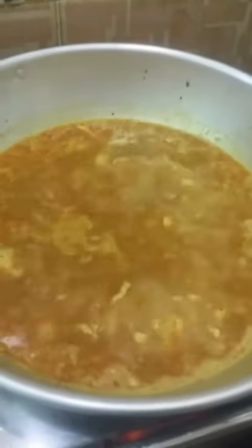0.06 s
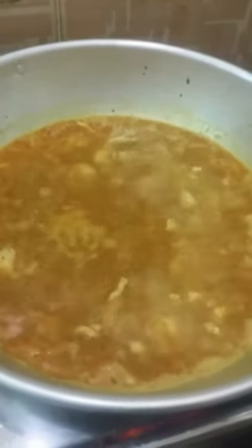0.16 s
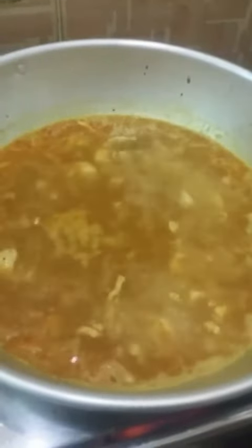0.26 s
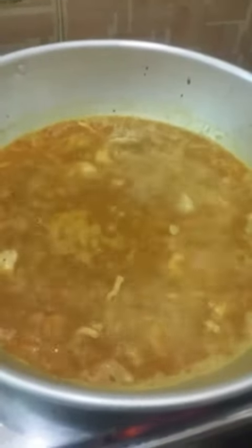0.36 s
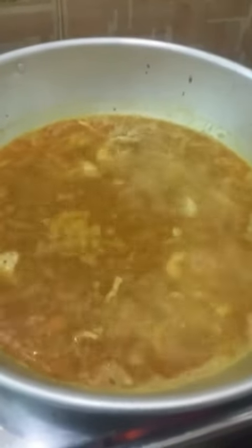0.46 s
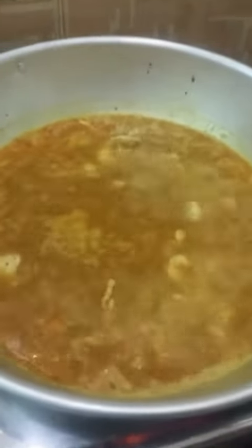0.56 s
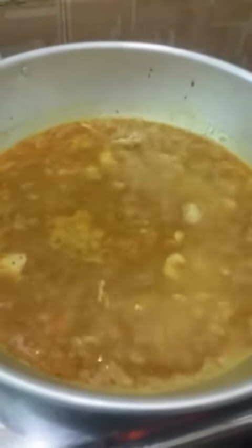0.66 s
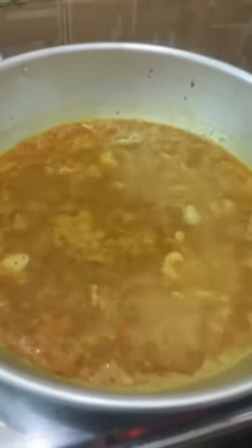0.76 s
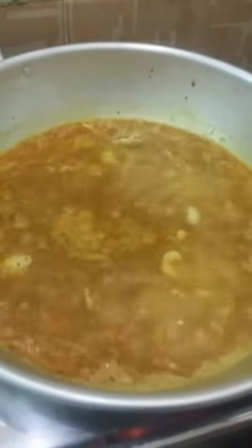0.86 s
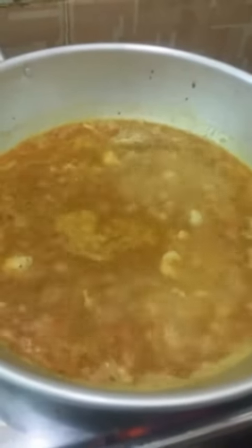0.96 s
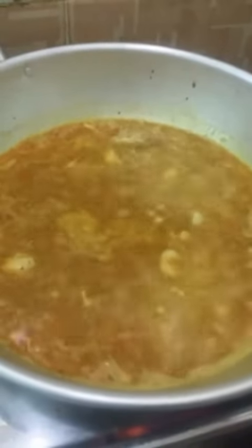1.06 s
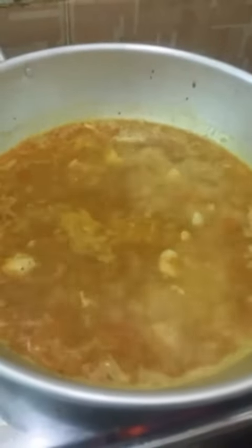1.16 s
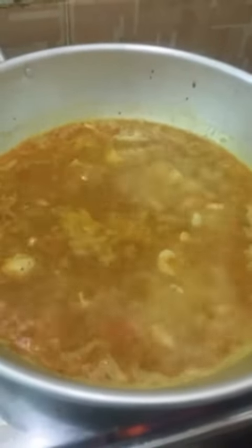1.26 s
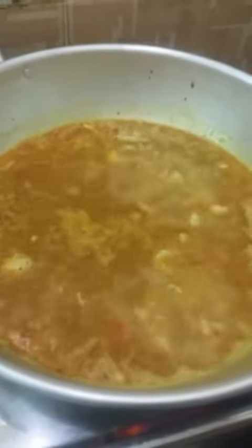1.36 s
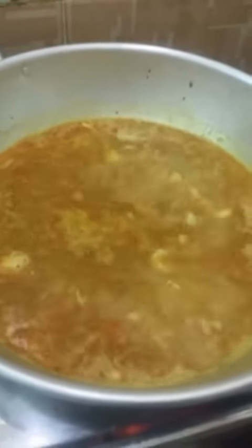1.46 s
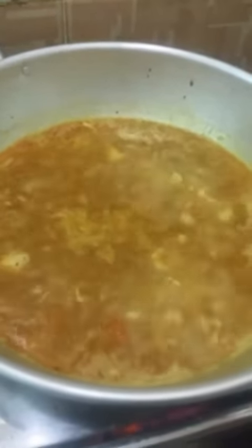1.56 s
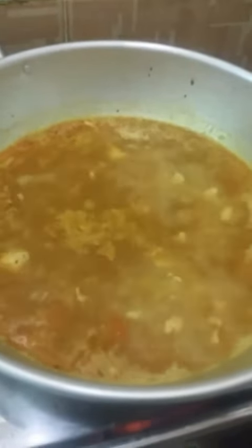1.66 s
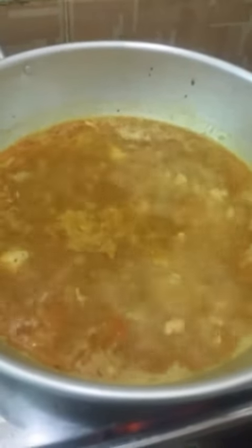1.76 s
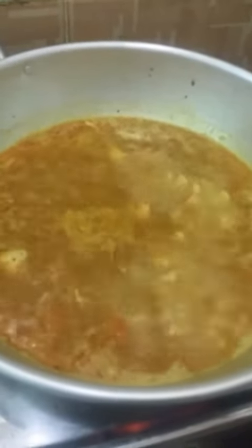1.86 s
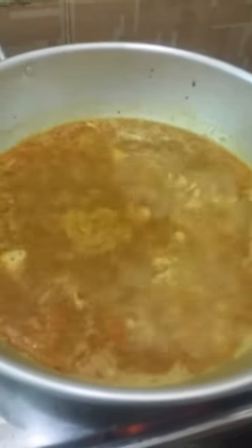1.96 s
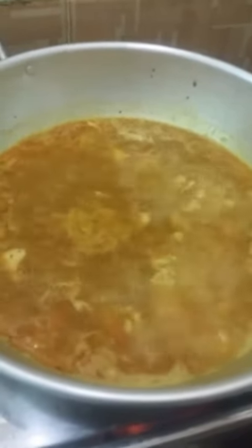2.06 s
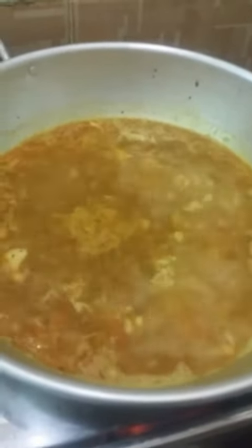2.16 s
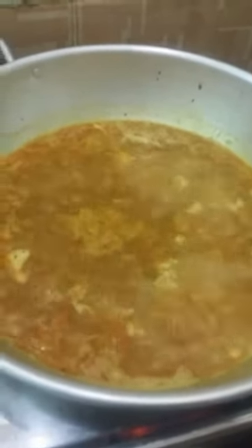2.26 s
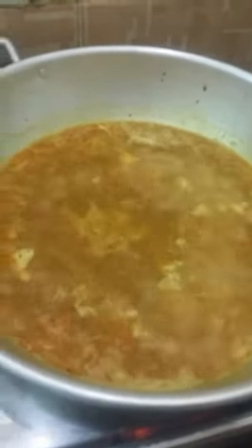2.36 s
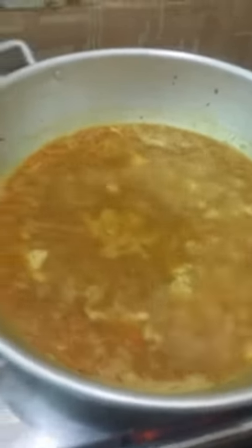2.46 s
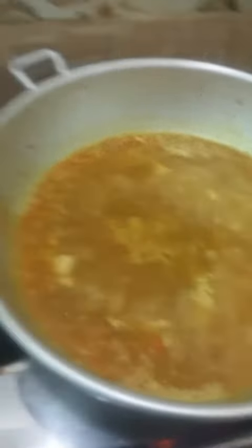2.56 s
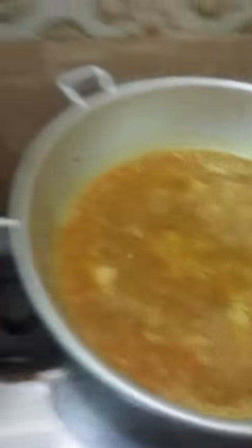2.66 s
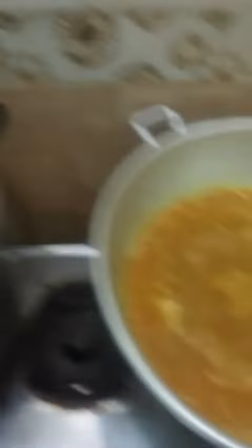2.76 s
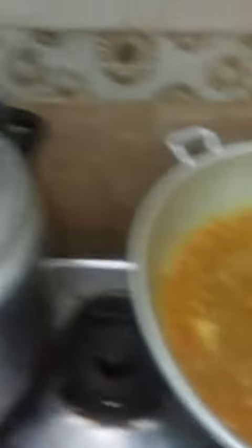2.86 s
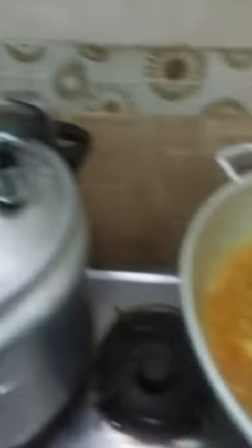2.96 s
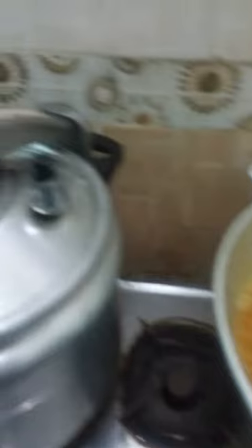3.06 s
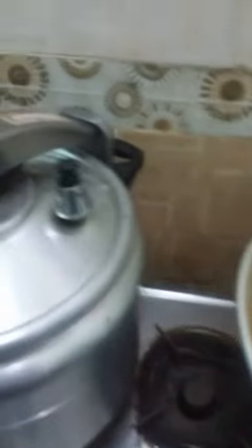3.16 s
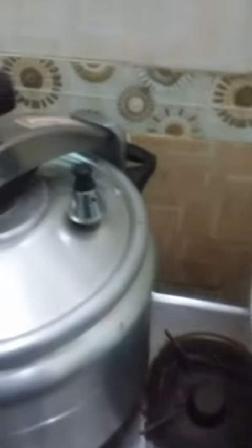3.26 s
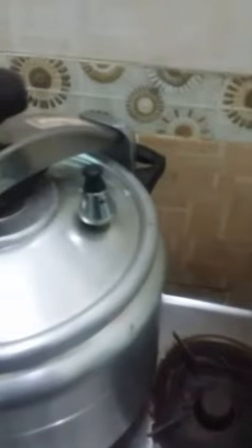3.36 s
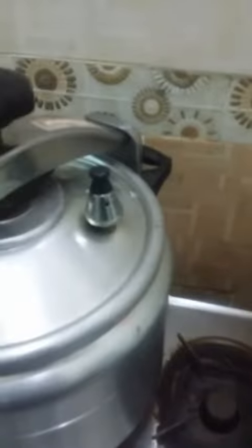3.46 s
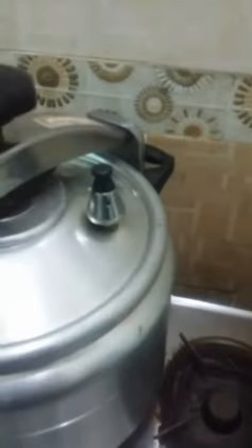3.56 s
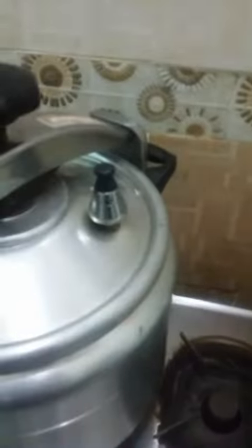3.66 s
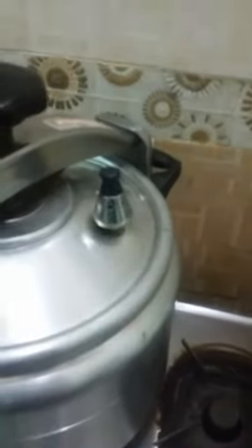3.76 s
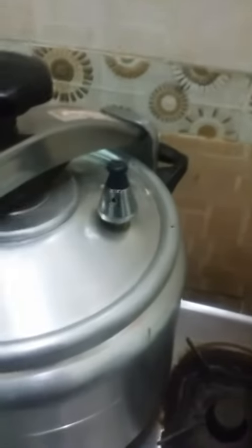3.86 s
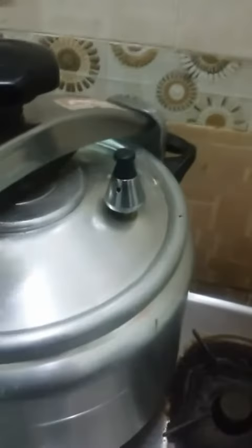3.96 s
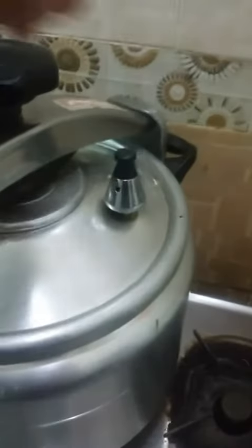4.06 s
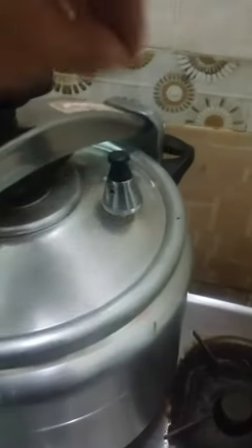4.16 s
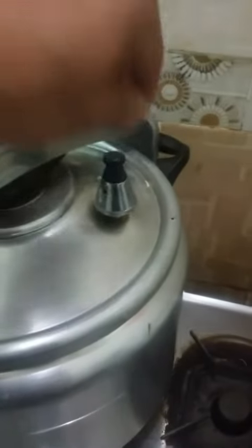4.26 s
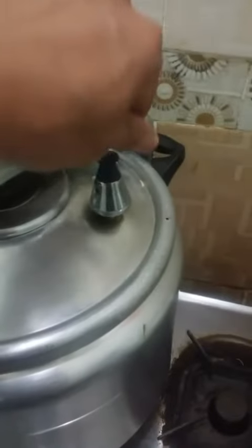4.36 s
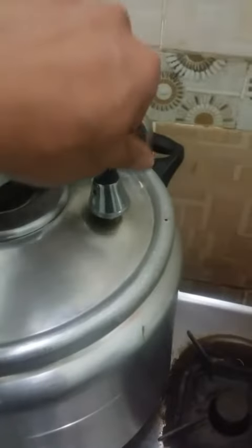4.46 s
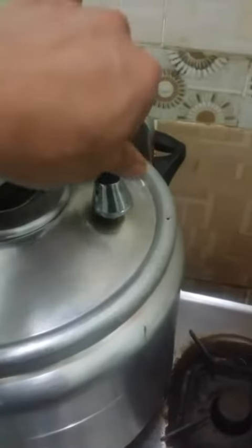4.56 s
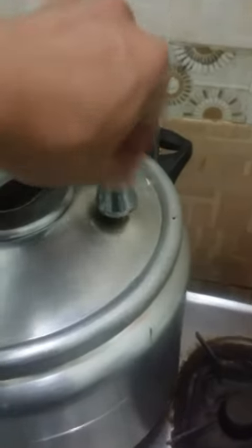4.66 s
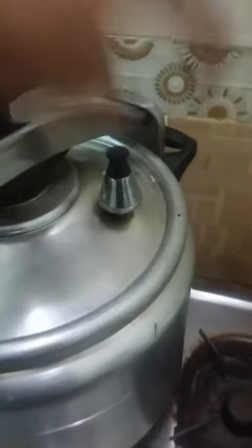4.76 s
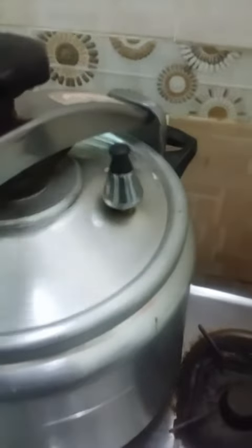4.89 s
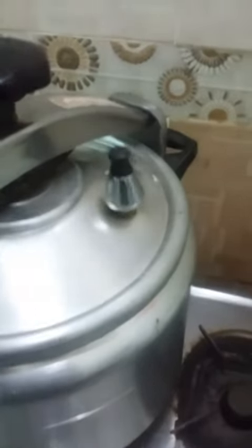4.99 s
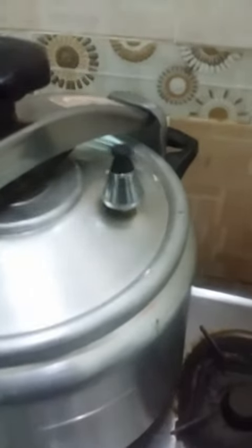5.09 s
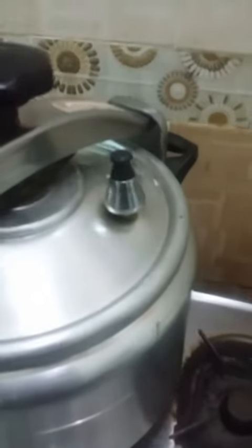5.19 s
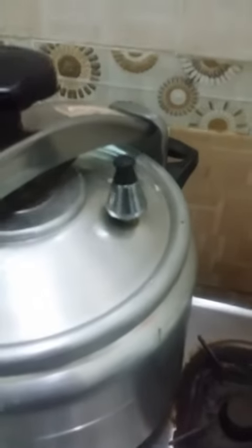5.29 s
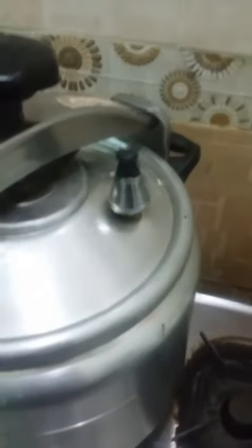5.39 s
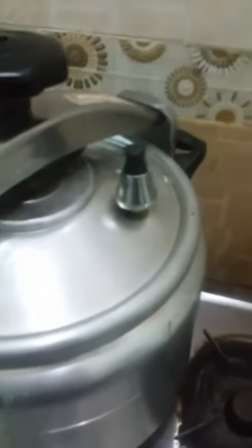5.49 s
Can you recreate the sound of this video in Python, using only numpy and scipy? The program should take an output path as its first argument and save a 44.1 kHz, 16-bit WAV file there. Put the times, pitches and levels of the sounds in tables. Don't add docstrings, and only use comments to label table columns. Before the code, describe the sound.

Continuous high-pitched steam hiss dominates, near and mono on a phone, dipping in quick uneven pulses. Distant knocks sound around two and a half seconds and more heavily near four. A dry tap on the phone lands between them. Then the hiss is briefly squeezed, two short damped metal clinks ring, and steam surges back slightly louder. Low stove rush and hum lie beneath; it cuts off abruptly.

```python
import sys
import numpy as np
from scipy import signal
from scipy.fft import rfft, irfft, next_fast_len
from scipy.io import wavfile
from scipy.ndimage import uniform_filter1d, map_coordinates

SR = 44100
rng = np.random.default_rng(int(sys.argv[2]) if len(sys.argv) > 2 else 0)


def undo_db(level):
    steps = np.asarray(level, float) / 20
    return 10 ** steps


def output_pcm(signal):
    pcm = np.clip(np.atleast_2d(signal).T, -1, 1) * 32767
    wavfile.write(sys.argv[1], SR, np.round(pcm).astype(np.int16))


N = 243873
T = np.arange(N) / SR

# [t/s, share turned to the lid 0-1]
TURN = [
    (0, 0.08),
    (2.45, 0.3),
    (2.85, 0.88),
    (5.6, 1),
]
# [t/s, level/dB]
PRESSURE = [(0, -23), (.9, -23.5), (1.75, -22), (2.4, -24.5), (2.5, -25.5), (2.78, -25), (2.84, -23.5),
            (3.6, -25), (3.97, -21), (4.2, -25.5), (4.46, -21), (4.6, -25.5), (4.72, -23), (4.78, -21.5),
            (5.0, -21.5), (5.23, -21.5), (5.31, -25)]
# [t/s, loss/dB, width/s]
ROCKS = [(0, 5, 0.045), (.11, 3.5, 0.033), (.22, 6.5, .025), (.324, 6, 0.043), (.45, 2.5, 0.029),
         (.535, 2.5, 0.036), (0.623, 3.5, 0.036), (0.999, 3.5, 0.043), (1.162, 2.5, 0.028),
         (1.252, 3, 0.037), (1.36, 1.5, 0.03), (1.44, 2, 0.073), (1.564, 4, 0.041), (1.652, 5, 0.054),
         (1.808, 6, .08), (1.941, 4, 0.1), (2.264, 3, 0.047), (3.059, 4, 0.033), (3.202, 3.5, 0.024),
         (3.317, 2, .03), (3.405, 4.5, 0.049), (3.631, 5, 0.047), (3.712, 8, 0.03), (3.799, 7.5, 0.057),
         (3.881, 4.5, 0.038), (4.04, 4.5, 0.084), (4.432, 5.5, .015), (4.679, 5, 0.024), (5.168, 3.5, .065)]
# [t/s, length/s, loss/dB]
CHOKES = [
    (4.273, 0.16, 8),
    (4.276, 0.033, 1),
    (4.316, 0.05, 6.5),
    (4.393, 0.035, 11.5),
    (4.712, 0.045, 6),
]
# [f/Hz, level/dB per Hz]
JET_PAN = [(470, -33), (800, -27.5), (1340, -13.5), (1830, -14), (2590, -1), (2920, -2.5), (3980, -4),
           (4880, 0.5), (6510, -5.5), (7970, -4.5), (9660, -10.5), (11300, -9.5), (14000, -10)]
JET_LID = [(470, -30), (800, -23), (1310, -19), (1660, -21.5), (1890, -13), (2240, -12.5), (2920, -5.5),
           (4760, -7.5), (5630, -3), (6130, -3.5), (8170, -13), (11200, -12.5), (14000, -11.5)]
# [f/Hz, width/Hz, depth/dB]
PAN_NULLS = [(1900, 120, 4), (2900, 110, 11), (3580, 90, 6), (3950, 100, 3), (6450, 130, 7), (7350, 120, 5),
             (8400, 90, 5), (9750, 220, 8), (10600, 250, 5)]
LID_NULLS = [(2750, 80, 5), (3600, 250, 2.5), (6150, 150, 4), (7300, 120, 3), (8050, 120, 3),
             (8400, 150, 3.5), (9100, 200, 2.5), (10500, 300, 2.5), (12900, 100, 3)]
# [f/Hz, width/Hz]
VENT = [(5620, 410), (7850, 490)]
# [level/dB over the pan, level/dB at the lid]
TONE_DB = (-13, -10)
# [t/s, level/dB under the jet]
OVERTONE = [
    (0, -18),
    (.75, -24),
    (1.7, -16),
    (2.0, -10.5),
    (2.42, -6),
    (2.52, -15.5),
    (3.0, -22),
    (5.3, -30.5),
]
# [t/s, peak level/dB]
CLINKS = [
    (4.321, -26.5),
    (4.4216, -15.5),
]
# [f/Hz, level/dB, t60/s]
WEIGHT_MODES = [(620, -19, .05), (900, -18, .03), (1180, -13, .03), (1480, -8, .03), (1680, -10, .03),
                (1868, -2, .03), (2150, -8, .03), (2487, -13, .03), (2929, 0, .025), (3957, -16, .02)]
# [t/s, level/dB, width/s]
TAP_PUSHES = [
    (3.5031, -13, .00011),
    (3.50345, -17, .0003),
    (3.5047, -18, .001),
]
# [t/s, level/dB, t60/s, centre f/Hz, spread/Hz]
KNOCKS = [(1.195, -36, 0.2, 730, 150), (2.547, -32, 0.4, 1050, 600), (2.58, -28.5, .3, 1950, 252),
          (2.599, -25, 0.12, 763, 150), (2.595, -28.5, .22, 1360, 603), (3.932, -19, 0.29, 560, 610),
          (3.939, -27, 0.44, 1920, 1800), (3.985, -28, 0.56, 650, 500), (4.035, -27.5, 0.34, 514, 500),
          (4.052, -26, 0.15, 750, 150), (4.076, -37, 0.52, 1085, 200), (3.95, -38.5, 1.2, 145, 150),
          (4.136, -30.5, .7, 2400, 1500), (4.14, -35, 1, 590, 1210)]
# [f/Hz, width/Hz, level/dB]
CUPBOARD = [(145, 35, -4), (345, 30, 0), (535, 30, -2), (660, 35, -4), (752, 28, 2), (1060, 32, -1),
            (1220, 40, -4), (1480, 50, -4), (1665, 30, -4), (2060, 80, -1), (2370, 60, -4), (2800, 120, -4)]
# [f/Hz, level/dB per Hz]
FLAME = [(15, -55.5), (30, -10.5), (69, -18.5), (103, -8.5), (167, -20), (210, -1.5), (341, -2),
         (615, -0.5), (880, -8.5), (1350, -2), (1800, -9.5), (3000, -10.5), (4500, -30.5), (6000, -120)]
# [f/Hz, width/Hz, level/dB]
HUM = [(102, 16, 0), (125, 18, -3), (144, 16, -2)]
# [f/Hz, level/dB]
COARSE = [(100, -16), (1000, -12), (1900, 0), (2800, 4), (4200, 5), (5500, 2), (7500, 3), (8500, 5.5),
          (11000, 5.5), (13000, 4), (13950, 8)]


def steam():
    pressure_db, = curves(PRESSURE)
    choke_db = choking()
    flow_db = pressure_db - rocking() - choke_db + 0.8 * wobble(25) + 0.9 * wobble(90)
    treble_db = facing((6, 4)) - 0.21 * choke_db + 0.5 * wobble(12)
    treble_db = treble_db - 0.4 * (pressure_db - pressure_db.mean())
    return undo_db(flow_db) * (jet_roar(treble_db) + vent_tones())


def rocking():
    return sum(loss_db * np.exp(-(2 * (T - s) / width) ** 2) for s, loss_db, width in ROCKS)


def choking():
    loss = 0
    for s, length, loss_db in CHOKES:
        press = np.clip((T - s) / 0.014, 0, 1)
        release = np.clip((s + length - T) / 0.0071, 0, 1)
        loss = loss + loss_db * press * release
    return loss


def jet_roar(treble_db):
    turn, = curves(TURN)
    low = lambda hz: 1 / (1 + (hz / 8500) ** 8)
    jet = 0
    for spectrum, echoes, share in (JET_PAN, PAN_NULLS, 1 - turn), (JET_LID, LID_NULLS, turn):
        colour = lambda hz: undo_db(along(spectrum, hz) - nulls(echoes, hz))
        roar = unit(filtered(eddies(patchy_db=1.13, streaky_db=1.5), colour))
        body = filtered(roar, low)
        jet = jet + np.sqrt(share) * (body + undo_db(treble_db) * (roar - body))
    return jet


def vent_tones():
    tones = 0
    overtone_db, = curves(OVERTONE)
    for (hz, width), under_db in zip(VENT, (facing(TONE_DB), overtone_db)):
        column = resonances([(hz, width, 0)])
        tone = unit(filtered(rng.standard_normal(N), lambda f: column(f) ** 2))
        tones = tones + undo_db(under_db + 1.0 * wobble(30) + 0.57 * wobble(6)) * tone
    return tones


def eddies(patchy_db, streaky_db):
    z = signal.stft(rng.standard_normal(N + 1024), nperseg=512)[2]

    def field(bins, hops):
        across = uniform_filter1d(rng.standard_normal(z.shape), bins, 0)
        return unit(uniform_filter1d(across, hops, 1))

    gain = undo_db(patchy_db * field(bins=6, hops=7) + streaky_db * field(bins=2, hops=11))
    return signal.istft(z * gain, nperseg=512)[1][:N]


def nulls(rows, hz):
    return sum(depth_db / (1 + (2 * (hz - c) / w) ** 2) for c, w, depth_db in rows)


def weight():
    out = np.zeros(N + SR)
    age = np.arange(SR // 20) / SR
    grip = (1 - np.exp(-age / 0.00064)) / (1 + (age / 0.011) ** 6)
    for s, db in CLINKS:
        ring = 0
        for hz, level, t60 in WEIGHT_MODES:
            decay = undo_db(level - 20 * age / t60)
            ring = ring + decay * np.sin(2 * np.pi * (hz * age + rng.uniform()))
        out[round(s * SR):][:len(age)] += undo_db(db - 1.0) * ring * grip
    return out[:N]


def tap():
    pushes = 0
    for k, (s, db, width) in enumerate(TAP_PUSHES):
        pushes = pushes + (-1) ** k * undo_db(db) * np.exp(-((T - s) / width) ** 2)
    return filtered(pushes, lambda f: (1j * f / (40 + 1j * f)) ** 2)


def knocks():
    rise_s = 0.0052
    blows, hz = 0, np.fft.rfftfreq(8192, 1 / SR)
    cupboard = resonances(CUPBOARD)
    for s, db, t60, centre_hz, spread_hz in KNOCKS:
        age = np.clip(T - s, 0, None)
        echoes = undo_db(db - 60 * age / t60 + 1.6 * wobble(60)) * (1 - np.exp(-age / rise_s))
        struck = resonances([(centre_hz, spread_hz, 0)])
        part = lambda f: struck(f) ** 2
        power = np.mean(np.abs(part(hz) * cupboard(hz)) ** 2)
        blows = blows + filtered(echoes * rng.standard_normal(N), part) / np.sqrt(power)
    return filtered(blows, cupboard)


def stove():
    flame = unit(filtered(eddies(patchy_db=1.2, streaky_db=0.8), lambda hz: undo_db(along(FLAME, hz))))
    hum = unit(filtered(rng.standard_normal(N), lambda f: resonances(HUM)(f) ** 2))
    flame_db = facing((-43, -48.5)) + 0.68 * wobble(9)
    hum_db = facing((-56.5, -61.5)) + 2.3 * wobble(6.1)
    return undo_db(flame_db) * flame + undo_db(hum_db) * hum


def facing(pair_db):
    return pair_db[0] + (pair_db[1] - pair_db[0]) * curves(TURN)[0]


def unit(x):
    return x / np.sqrt(np.mean(x ** 2) + 1e-20)


def along(points, hz):
    f, v = np.transpose(points)
    return np.interp(np.log(hz + 1), np.log(f + 1), v)


def curves(rows):
    s, *cols = np.transpose(rows)
    return [np.interp(T, s, c) for c in cols]


def wobble(rate):
    knots = rng.standard_normal(int(N * rate / SR) + 4)
    return map_coordinates(knots, [np.arange(N) * rate / SR])


def filtered(x, response):
    m = next_fast_len(N + SR // 2)
    return irfft(rfft(x, m) * response(np.fft.rfftfreq(m, 1 / SR)), m)[..., :N]


def resonances(modes):
    def response(f):
        total = 0
        for k, (c, w, db) in enumerate(modes):
            total = total + (-1) ** k * undo_db(db) * 1j * f * w / (c * c - f * f + 1j * f * w)
        return total
    return response


def phone_rounding(x):
    block, top_hz = 1024, 13960
    n, k = np.arange(2 * block) + 0.5, np.arange(block) + 0.5
    window = np.sqrt(2 / block) * np.sin(np.pi * n / (2 * block))
    basis = window * np.cos(np.pi / block * np.outer(k, n + block / 2))
    padded = np.pad(x, (block, 2 * block - N % block))
    frames = np.lib.stride_tricks.sliding_window_view(padded, 2 * block)[::block]
    lines = frames @ basis.T
    mask = np.sqrt(np.abs(uniform_filter1d(lines ** 2, size=70, axis=1)) + 1e-16)
    parts = np.mean(frames.reshape(len(frames), 8, -1) ** 2, axis=2) + 1e-16
    sudden = parts.max(axis=1) > 12 * parts.min(axis=1)
    hz = k * SR / (2 * block)
    step = mask * undo_db(along(COARSE, hz) - 20 * sudden[:, None])
    lines = np.sign(lines) * np.floor(np.abs(lines) / step + 0.4) * step * (hz < top_hz)
    halves = (lines @ basis).reshape(len(frames), 2, block)
    return (halves[1:, 0] + halves[:-1, 1]).ravel()[:N]


def scene():
    kitchen = steam() + weight() + tap() + knocks() + stove()
    return np.array([1, 1])[:, None] * kitchen


def band_limit(x):
    return signal.sosfilt(signal.butter(12, 15130, fs=SR, output="sos"), x)


def record(dry):
    end_s = 5.3118
    kept = phone_rounding(dry[0]) * (np.arange(N) < end_s * SR)
    return band_limit(np.array([kept, kept]))


dry = scene()
out = record(dry)
output_pcm(out)
```